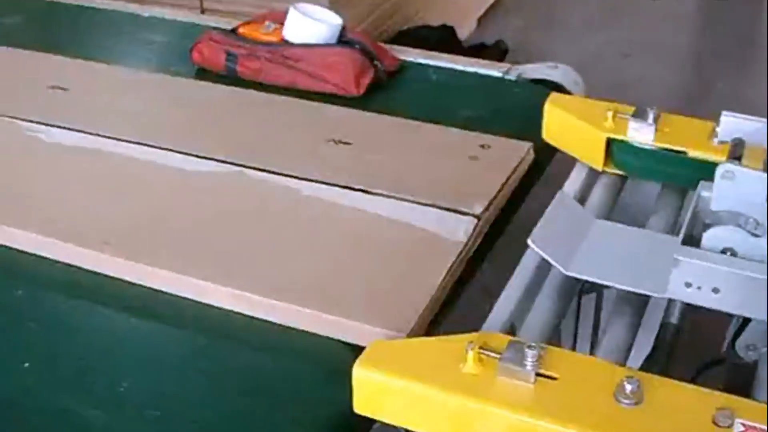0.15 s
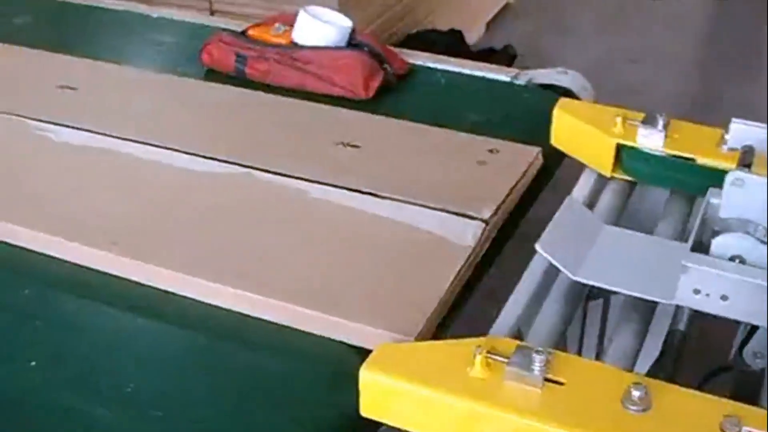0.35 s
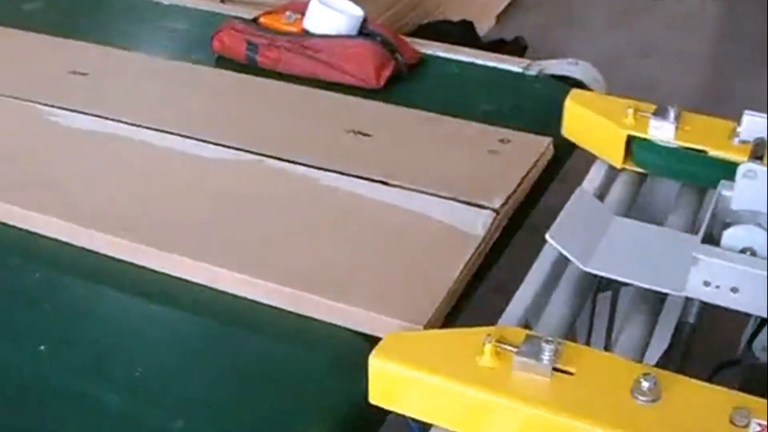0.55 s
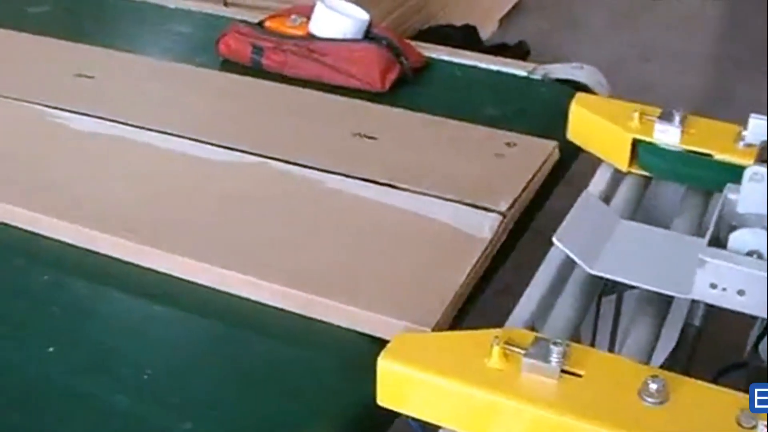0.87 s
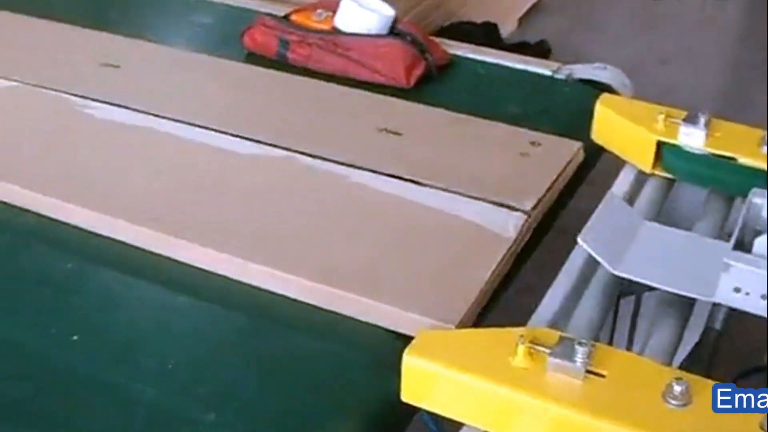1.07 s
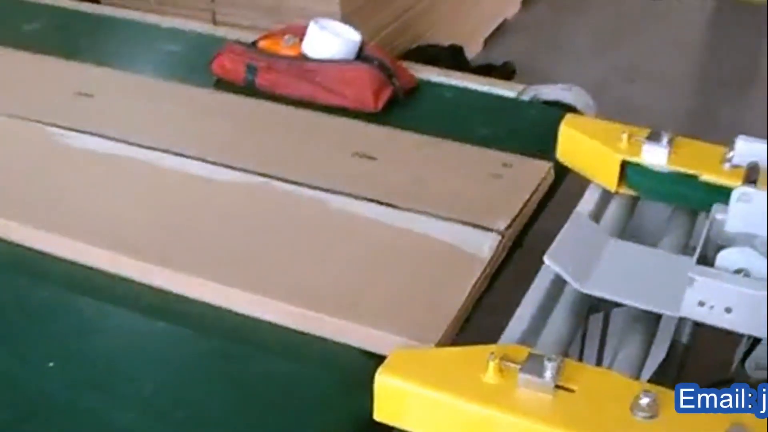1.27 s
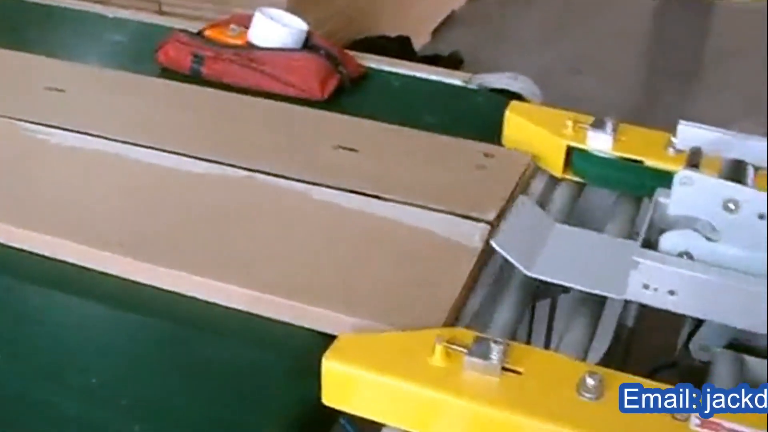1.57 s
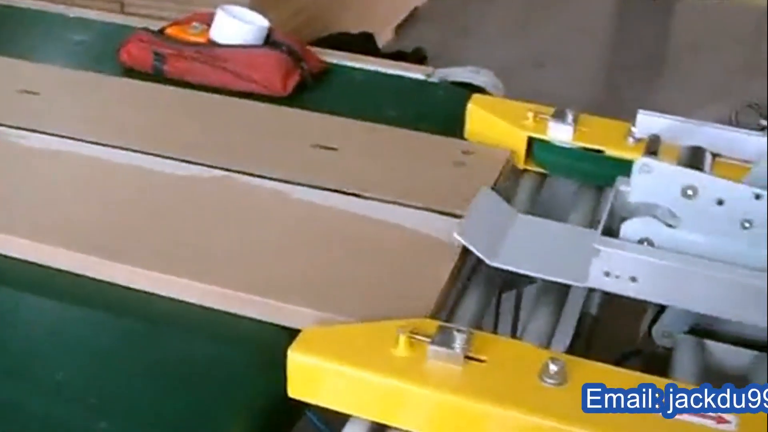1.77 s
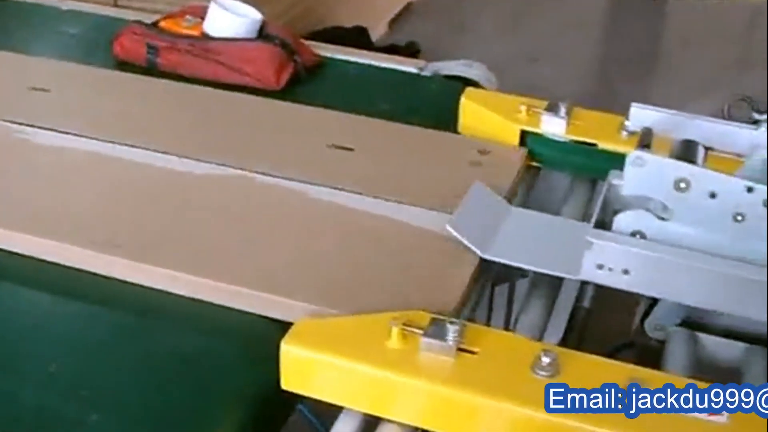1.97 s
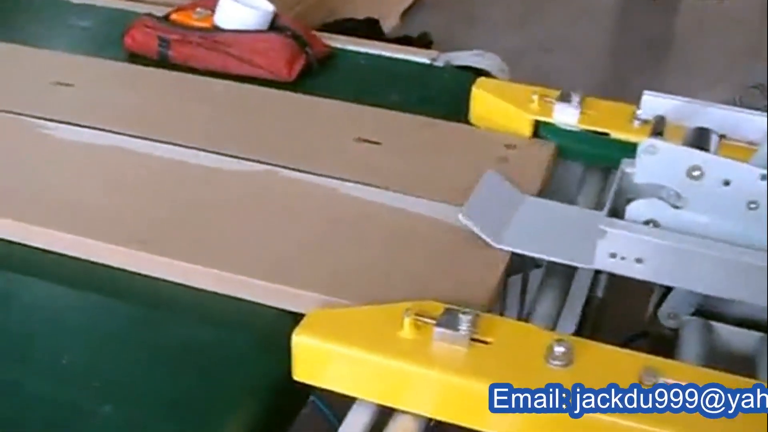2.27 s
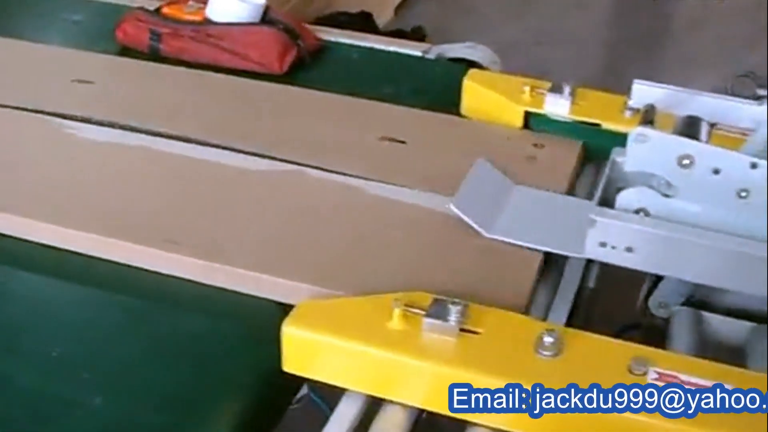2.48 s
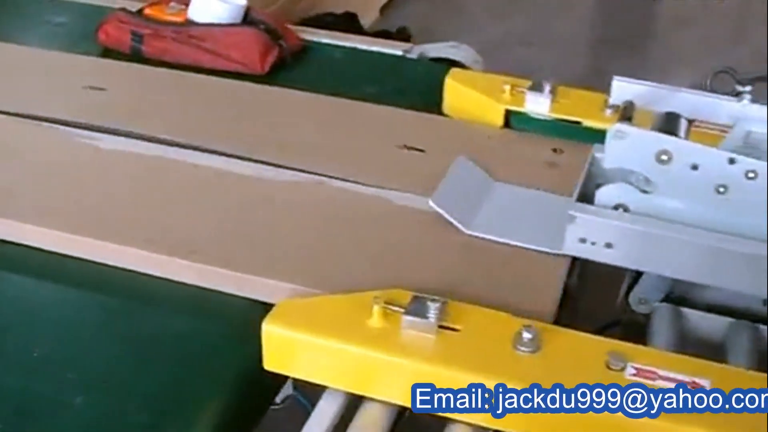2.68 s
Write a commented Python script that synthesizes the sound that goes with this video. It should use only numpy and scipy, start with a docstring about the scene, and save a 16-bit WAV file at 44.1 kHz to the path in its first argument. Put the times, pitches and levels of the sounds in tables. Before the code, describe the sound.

Close microphones catch the constant rough roar of a box sealer's conveyor in a workshop, its gear hum swelling and sinking, with an air hiss near the start and small squeaks and metal ticks later.

```python
"""A carton sealer in a factory hall, heard through two close microphone ports after an abrupt start.
Belt and motor noise roars throughout as coloured noise; a gear mesh drones as a wavering sine that
swells and sinks, beside sidebands and steadier motor tones. A puff of compressed air is hissing noise
on a level curve that peaks near 0.5 s. Rollers squeal now and then as short high sines with a hall
tail, and from 1.27 s small metal parts rattle as decaying bursts of band noise."""
import sys
import numpy as np
from scipy import signal
from scipy.fft import rfft, irfft, next_fast_len
from scipy.io import wavfile
from scipy.ndimage import uniform_filter1d, map_coordinates

SR = 44100
rng = np.random.default_rng(int(sys.argv[2]) if len(sys.argv) > 2 else 0)


def ratio(d):
    """dB to gain"""
    e = np.asarray(d, float) / 20
    return 10 ** e


def wav_out(sig):
    """Save sig, one row per channel (or a flat mono array), as 16-bit PCM at SR to the path in sys.argv[1]."""
    wavfile.write(sys.argv[1], SR, np.round(np.clip(np.atleast_2d(sig).T, -1, 1) * 32767).astype(np.int16))


N = 124803  # length in samples


def unit(x):
    """Scales a signal to rms 1."""
    return x / np.sqrt(np.mean(np.abs(x) ** 2) + 1e-20)


def along(points, hz):
    """Reads (Hz, value) points at any frequency, on a log frequency axis."""
    f, value = np.transpose(points)
    return np.interp(np.log(hz + 1), np.log(f + 1), value)


def curves(rows):
    """Draws one value per sample for each column after the time in seconds."""
    seconds, *columns = np.transpose(rows)
    t = np.arange(N) / SR
    return [np.interp(t, seconds, column) for column in columns]


def wobble(rate):
    """A smooth random curve through rate random knots a second."""
    knots = rng.standard_normal(400)
    return map_coordinates(knots, [np.arange(N) * rate / SR])


def filtered(x, response):
    """Multiplies the spectrum of x by a complex response of frequency."""
    m = next_fast_len(N + 8192)
    spectrum = rfft(x, m) * response(np.fft.rfftfreq(m, 1 / SR))
    return irfft(spectrum, m)[..., :N]


def rush(response, patchy_db):
    """Two unrelated coloured noises, rms 1 overall, with random gain patches that both share."""
    spectra = signal.stft(rng.standard_normal((2, N)), nperseg=512)[2]
    patches = rng.standard_normal(spectra.shape[1:])
    patches = uniform_filter1d(patches, size=6, axis=0)  # across frequency
    patches = uniform_filter1d(patches, size=12, axis=1)  # across time
    noise = signal.istft(spectra * ratio(patchy_db * unit(patches)), nperseg=512)[1][:, :N]
    return unit(filtered(noise, response))


def bell(hz, width_hz):
    """Complex response of one damped resonance, 1 at its centre."""
    return lambda f: 1j * f * width_hz / (hz * hz - f * f + 1j * f * width_hz)


def tone(hz, wander_hz, sway_db):
    """A sine of rms near 1 whose pitch and level waver at random; a wider wander is also faster."""
    pitch = hz + wander_hz * wobble(4 + 2 * wander_hz)
    phase = 2 * np.pi * (np.cumsum(pitch) / SR + rng.random())
    return np.sqrt(2) * ratio(sway_db * wobble(7.06)) * np.sin(phase)


def roar():
    """Belts, rollers and the hall's machinery make broad noise; frame resonances ring in it."""
    # Spectrum of the broad noise. Each row: frequency in Hz, relative density in dB per Hz.
    colour = [(15, -45), (28, -25), (50, -17.5), (90, -18.5), (160, -12.5), (240, -15.5), (400, -12),
              (600, -12), (800, -12), (1300, -12), (2000, -11), (2700, -16), (3300, -20), (4500, -22.5),
              (5600, -28.5), (6500, -29.5), (7400, -33.5), (8500, -32.5), (10600, -33), (11300, -37.5),
              (11700, -54.5), (12500, -68)]
    # Resonances of the frame. Each row: frequency in Hz, width in Hz, rms in dB before the level curve.
    frame = [(326, 64, -28), (985, 110, -34), (588, 34, -37)]
    # Slow rise and fall of the whole roar. Each row: time in seconds, gain in dB.
    swell = [(0, -1.5), (.5, .5), (1, 0), (1.5, -.5), (2, 0), (2.4, -0.5), (2.83, 0.5)]
    broad = ratio(-19.5) * rush(lambda f: ratio(along(colour, f)), patchy_db=1)
    ring = sum(ratio(db) * rush(bell(hz, width), patchy_db=0) for hz, width, db in frame)
    gain_db, = curves(swell)
    flutter_db = 0.39 * wobble(8.99)
    return ratio(gain_db + flutter_db) * (broad + ring)


def gears():
    """Meshing teeth drone on a swelling sine with sidebands; motor and gear tones keep a fixed mean level."""
    # Gear mesh. Each row: time in seconds, pitch in Hz, level in dB.
    mesh_path = [(.15, 327.5, -29.5), (.3, 327.5, -20), (.42, 327, -28), (.5, 327.3, -18),
                 (.63, 327, -36.5), (.7, 326.8, -20), (.75, 327, -26), (.82, 327.4, -24), (1.2, 327.3, -25),
                 (1.26, 327.3, -29.5), (1.33, 327.8, -23), (1.5, 327.8, -16.5), (1.6, 327.8, -32),
                 (1.85, 327.3, -24), (2.05, 326.7, -22), (2.19, 326.8, -35), (2.32, 327.7, -16.5),
                 (2.4, 327.3, -24), (2.48, 327, -23), (2.6, 326.5, -32), (2.83, 327, -19.5)]
    # Sidebands. Each row: offset from the mesh in Hz, dB against its mean level in dB, pitch wander in Hz.
    sidebands = [(-4.5, -12, 0.79), (6, -19.5, 0.81), (17, -6.5, 2.51)]
    # Steady motor and gear tones. Each row: pitch in Hz, level in dB, pitch wander in Hz.
    steady_tones = [(53.3, -47.5, 4.03), (100, -52, 2), (199.5, -36.5, 1.516), (552, -44.5, 2.05),
                    (581, -40, 2.06), (656, -48, 2.03), (723, -46, 3.07), (825, -39, 4), (1009, -37.5, 2.5),
                    (1038, -40.5, 1.96), (1100, -49.5, 1.6), (1245, -40.5, 8), (1643, -40, 7.1),
                    (6180, -54, 8), (8096, -53, 1.9)]
    hz, db = curves(mesh_path)
    mesh = ratio(db) * tone(hz, wander_hz=0.43, sway_db=1.4)
    beside = sum(ratio(db.mean() + under) * tone(hz + offset, wander, sway_db=1.0)
                 for offset, under, wander in sidebands)
    steady = sum(ratio(level) * tone(pitch, wander, sway_db=3.5) for pitch, level, wander in steady_tones)
    return mesh + beside + steady


def puff():
    """Escaping compressed air: turbulent, mostly high noise that swells and dies away."""
    # Level of the hiss. Each row: time in seconds, rms in dB.
    path = [(0.16, -46), (0.244, -50), (0.264, -41), (0.488, -30), (0.802, -50.5), (0.896, -51), (0.9, -48)]
    # Spectrum of the hiss. Each row: frequency in Hz, relative density in dB per Hz.
    colour = [(3000, -30), (4500, -1), (6000, 6), (8000, 5), (11000, 6.5), (13000, -30)]
    last_s = path[-1][0]
    db, = curves(list(path) + [(last_s + .15, -70)])
    return ratio(db) * rush(lambda f: ratio(along(colour, f)), patchy_db=3.0)


def squeals():
    """Rollers sing briefly around two pitches, each a wavering sine with short straight fades."""
    # Each row: start in seconds, length in seconds, pitch in Hz, level in dB.
    events = [(0.179, 0.61, 5825, -46), (0.851, .35, 5825, -48), (1.57, .36, 5840, -41),
              (2.21, 0.066, 5310, -34), (2.36, .07, 5280, -34), (2.497, .06, 5297, -37),
              (2.65, .09, 5295, -44)]
    edge_s = .02
    t = np.arange(N) / SR
    total = np.zeros(N)
    for start, length, hz, db in events:
        to_nearer_end = np.minimum(t - start, start + length - t)
        gate = np.clip(to_nearer_end / edge_s, 0, 1)
        total += ratio(db) * gate * tone(hz, wander_hz=8, sway_db=2.0)
    return total


def hall(x):
    """Reverberation of the hall: two unrelated noise tails that fall 60 dB in t60_s."""
    t60_s = .4
    t = np.arange(SR) / SR
    tail = rng.standard_normal((2, SR)) * ratio(-60 * t / t60_s)
    return signal.fftconvolve(x[None], tail / np.linalg.norm(tail[0]), axes=1)[:, :N]


def rattles():
    """Small metal parts knock: each sets off a sudden, decaying burst of noise in one high band."""
    # Each row: start in seconds, level at the start in dB.
    knocks = [(1.27, -43), (1.878, -32), (1.92, -37), (1.98, -34), (2.022, -40)]
    t60_s = .08
    t = np.arange(N) / SR
    fade = sum(ratio(db - 60 * np.abs(t - start) / t60_s) * (t >= start) for start, db in knocks)
    ring = bell(hz=8600, width_hz=680)
    return fade * rush(lambda f: ring(f) ** 2, patchy_db=0)  # squared: the resonance acts twice


def ports(pair):
    """Two close microphone ports: first row shared, second added left and subtracted right, then skewed."""
    # Level of the second row against the shared one. Each row: frequency in Hz, gain in dB.
    apart = [(30, -9), (60, -8), (110, -13), (190, -20.5), (350, -31.5), (620, -44), (1100, -41.5),
             (2000, -24.5), (3500, -12), (5000, -6), (6400, -4), (7500, -3), (8300, -13), (9000, -8.5),
             (11500, -14)]
    # Level of the left port over the right. Each row: frequency in Hz, difference in dB.
    tilt = [(30, -2), (60, -1), (150, 0), (3000, 0), (5000, 1), (12000, 1)]
    # Phase by which the left port leads the right. Each row: frequency in Hz, lead in radians.
    lead = [(0, 0), (3000, 0), (4900, -.3), (5800, -.7), (6300, -.4), (7600, -.6), (8050, 0), (12000, 0)]
    shared = pair[0]
    side = filtered(pair[1], lambda f: ratio(along(apart, f)))

    def skew(f):
        """Half the tilt and lead goes to the left port, the inverse to the right."""
        half = ratio(along(tilt, f) / 2) * np.exp(.5j * along(lead, f))
        return np.array([half, 1 / half])

    return filtered(np.array([shared + side, shared - side]), skew)


def scene():
    """All sources at the two ports; gears and direct squeals enter both rows alike."""
    machine = roar() + gears() + puff()
    squeal = squeals()
    echo = ratio(-9) * hall(squeal)
    return ports(machine + squeal + echo + rattles())


def roll_off(x):
    """The treble ends steeply here."""
    return signal.sosfilt(signal.butter(12, 12090, fs=SR, output="sos"), x)


def record(dry):
    """The microphones open abruptly after a short silence."""
    start_s, rise_s = 0.141, 0.0024
    opening = np.clip((np.arange(N) / SR - start_s) / rise_s, 0, 1)
    return roll_off(dry * opening)


dry = scene()
out = record(dry)
wav_out(out)
```